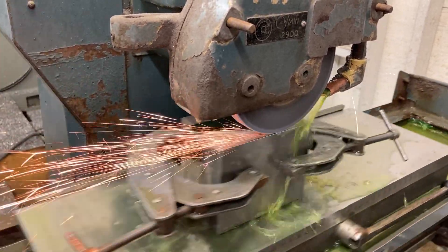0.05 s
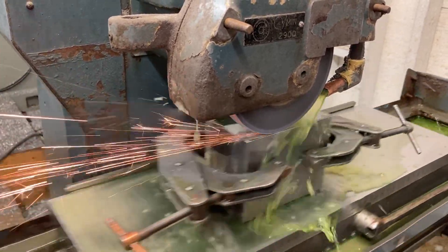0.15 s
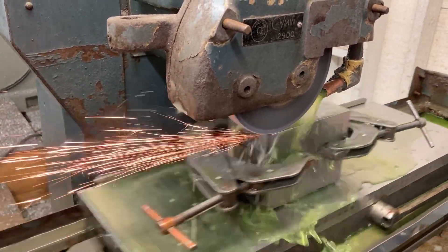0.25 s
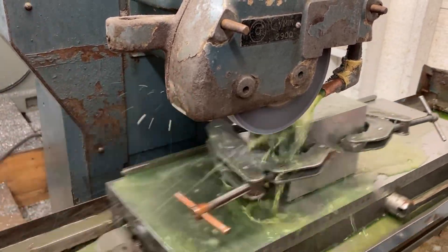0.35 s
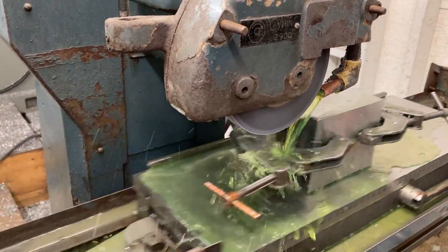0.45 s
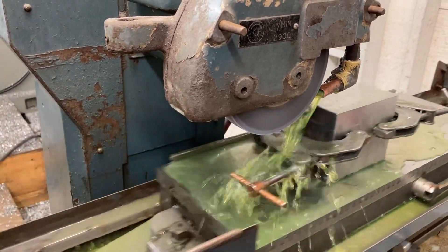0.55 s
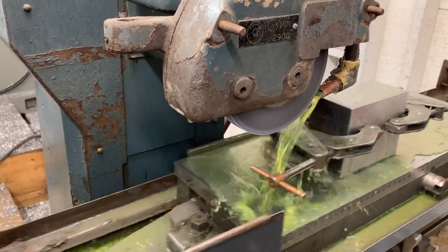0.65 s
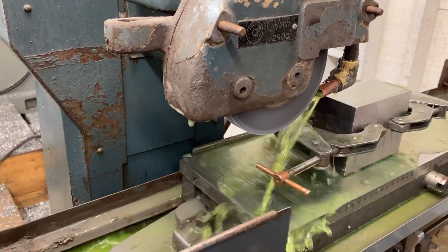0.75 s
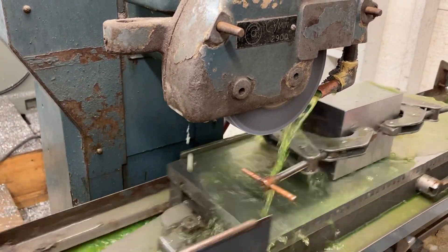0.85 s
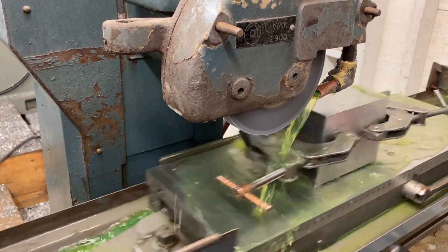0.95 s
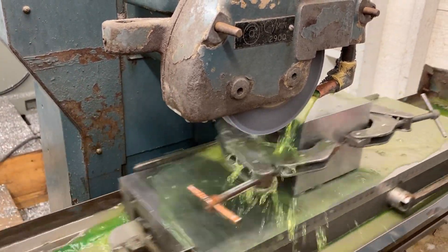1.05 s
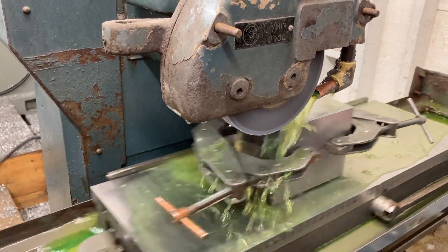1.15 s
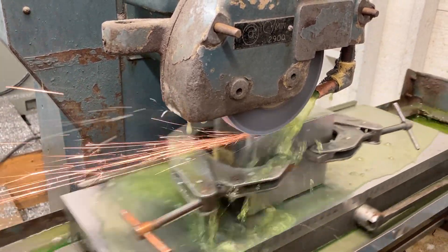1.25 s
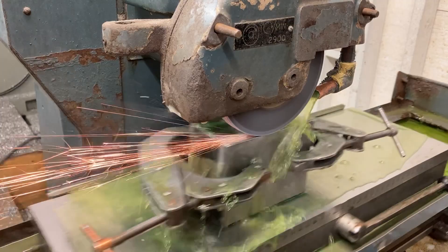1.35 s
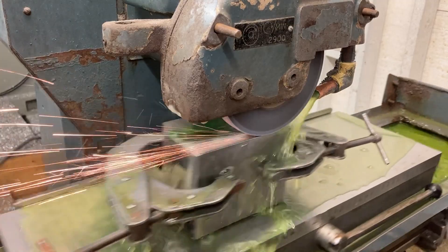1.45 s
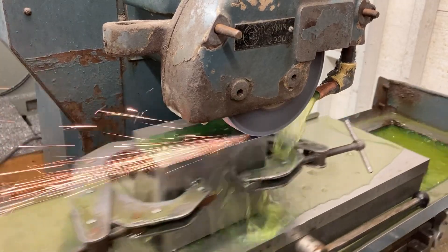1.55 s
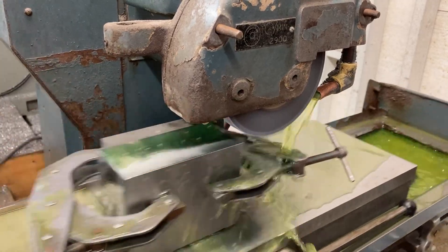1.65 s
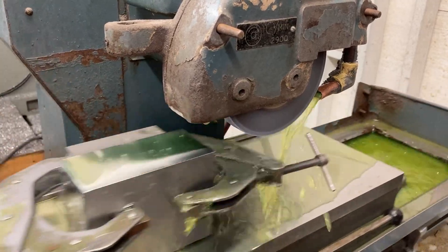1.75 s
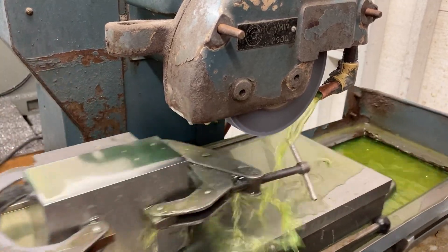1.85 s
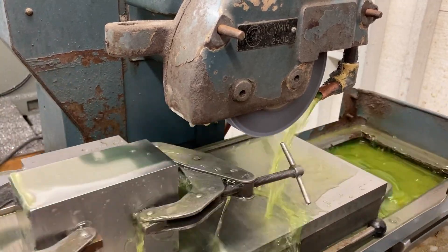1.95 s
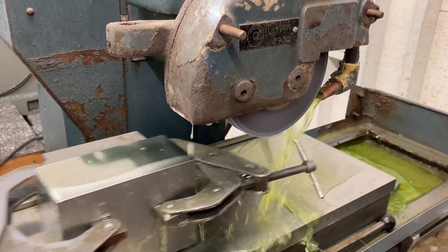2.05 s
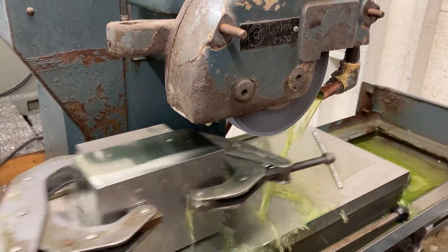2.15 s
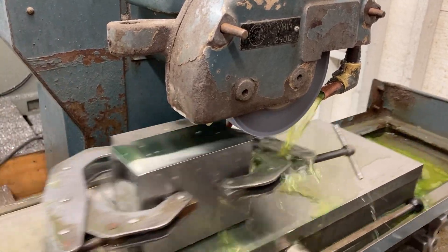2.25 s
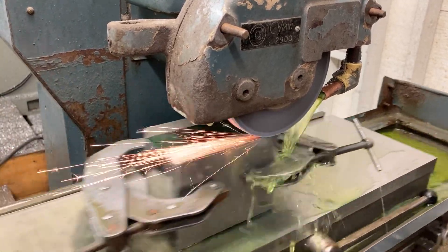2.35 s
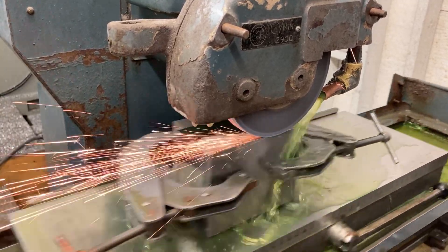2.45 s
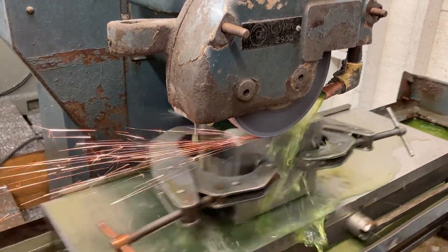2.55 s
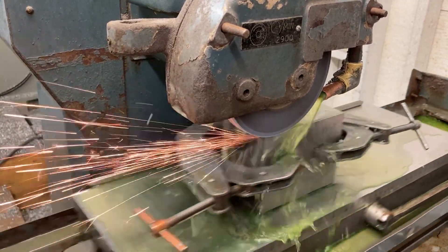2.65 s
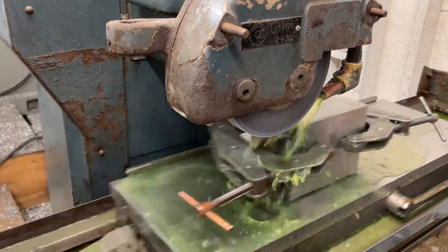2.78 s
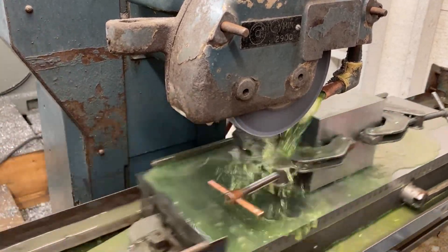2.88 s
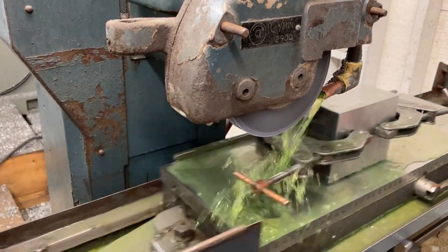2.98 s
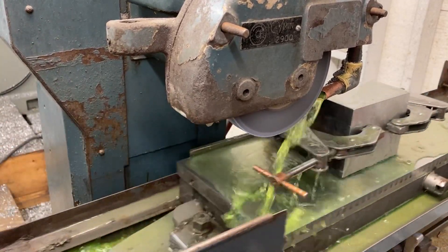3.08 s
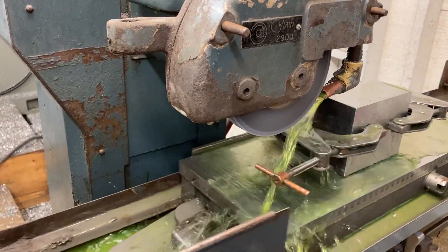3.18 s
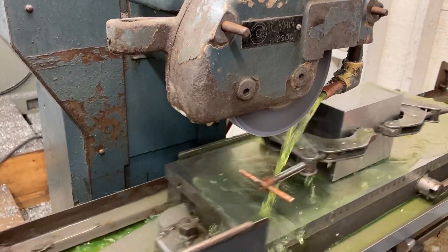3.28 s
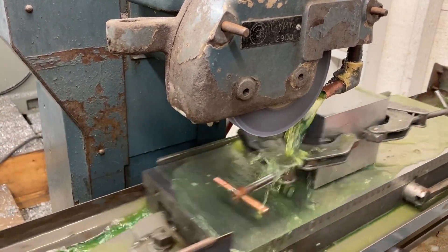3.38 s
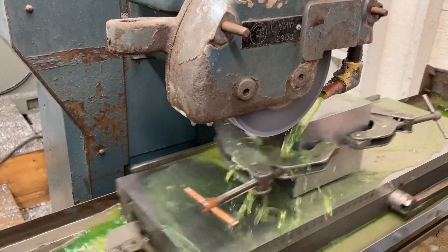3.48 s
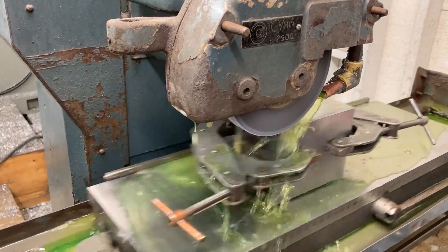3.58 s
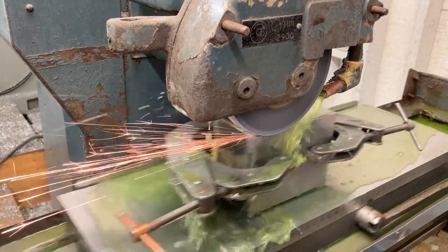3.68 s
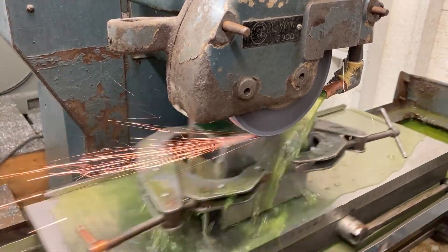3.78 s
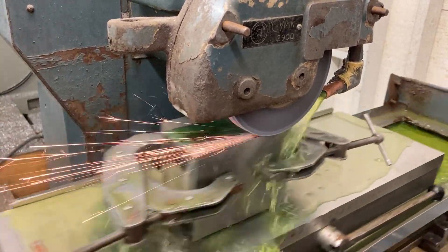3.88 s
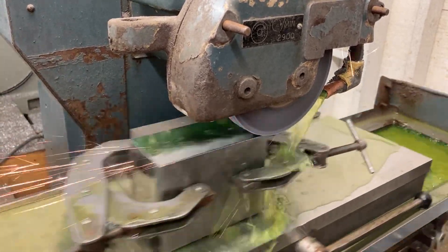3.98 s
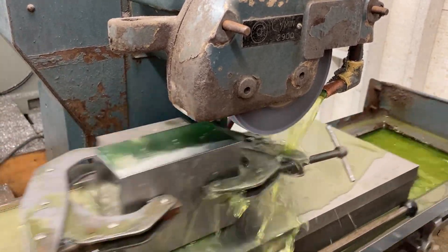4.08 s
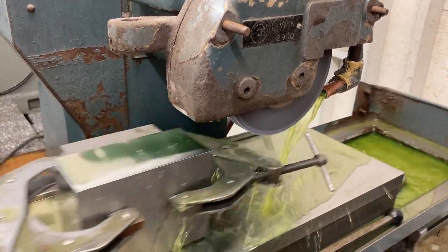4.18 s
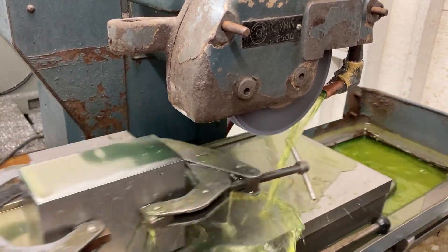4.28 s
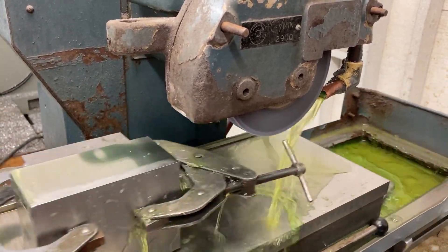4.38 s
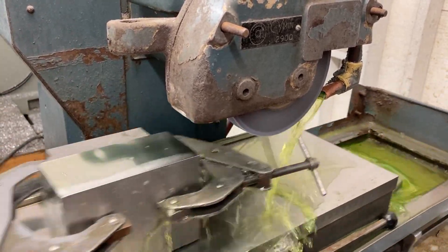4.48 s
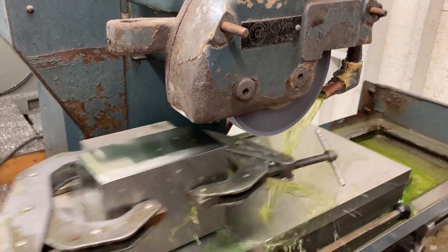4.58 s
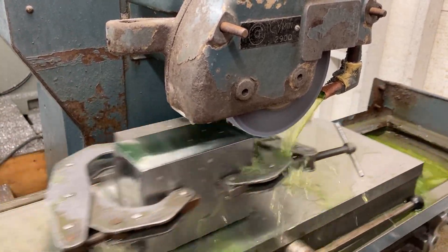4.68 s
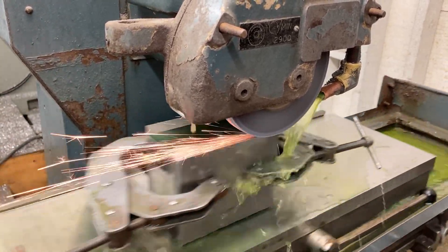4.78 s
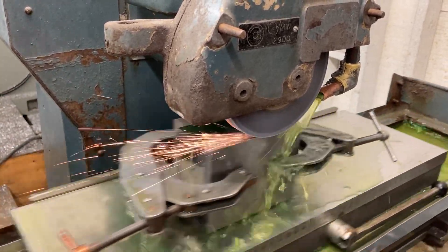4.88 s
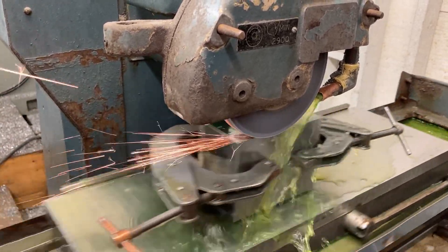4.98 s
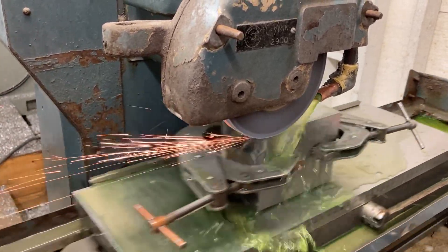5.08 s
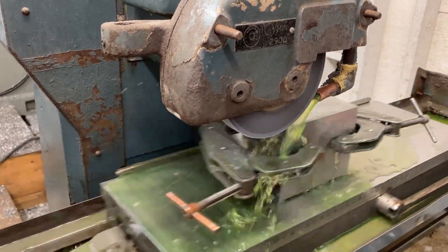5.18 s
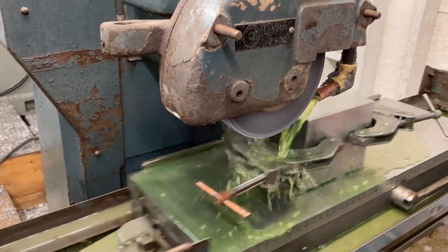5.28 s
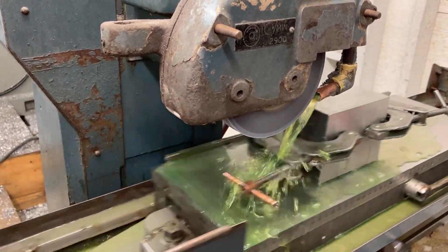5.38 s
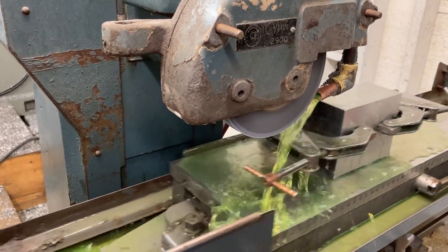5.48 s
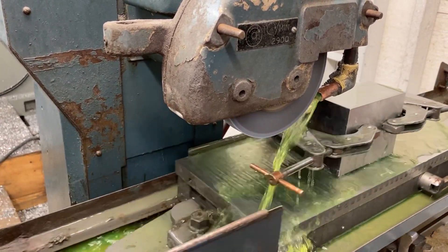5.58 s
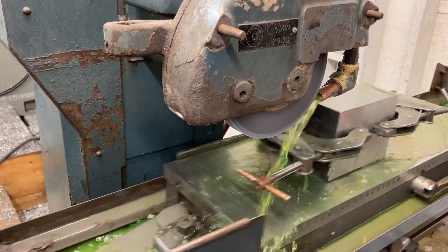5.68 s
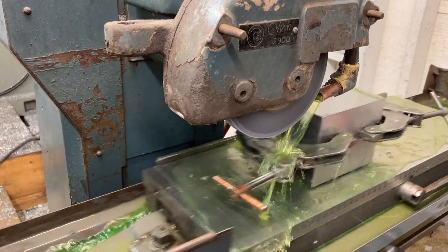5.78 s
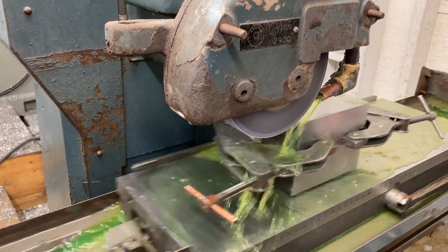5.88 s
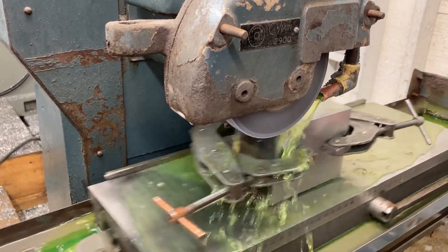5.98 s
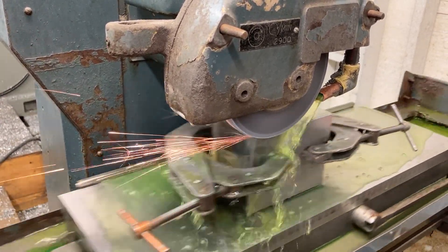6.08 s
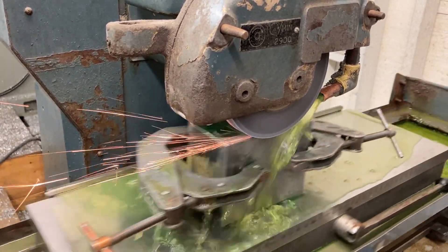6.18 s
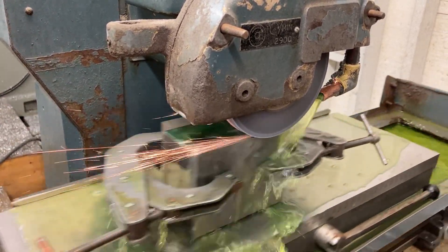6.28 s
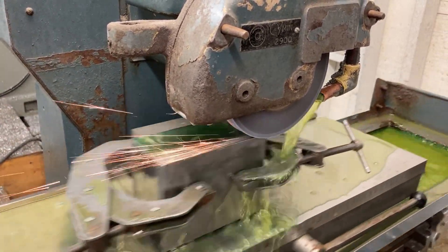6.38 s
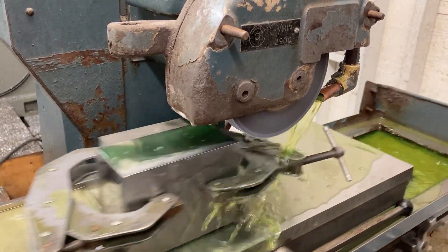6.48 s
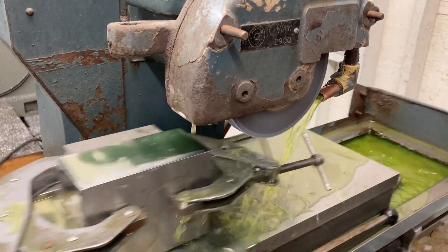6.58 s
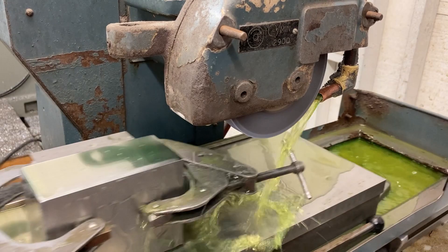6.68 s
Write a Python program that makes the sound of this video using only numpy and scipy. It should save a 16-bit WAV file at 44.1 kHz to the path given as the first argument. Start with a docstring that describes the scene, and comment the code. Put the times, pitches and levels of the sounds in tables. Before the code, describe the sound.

Harsh, ringing bursts of grinding come about every 1.2 seconds over motor whine and pump hum, each followed by a metallic clack and quick clicking.

```python
"""In a machine shop, a surface grinder carries a steel block to and fro under its wheel.
Grit force, repeating with each turn, excites resonances that sing at each pass. Trip dogs clack on the
reversing lever and the cross-feed ratchet rattles: short contact forces that ring steel modes.
The hydraulic pump hums on a wavering sine, bearings whine in thin tones over noise bands, coolant
patters as rising blips, and coloured noise fills the shop. A phone close by hears it in stereo."""
import sys
import numpy as np
from scipy import signal
from scipy.fft import rfft, irfft, next_fast_len
from scipy.io import wavfile
from scipy.ndimage import uniform_filter1d

SR = 44100
rng = np.random.default_rng(int(sys.argv[2]) if len(sys.argv) > 2 else 0)


def wav_record(signal):
    """Record a signal, one row per channel, as 16-bit PCM in the file named by sys.argv[1]."""
    frames = np.transpose(np.atleast_2d(signal))
    bounded = np.clip(frames, -1, 1)
    # unit amplitude maps onto the largest positive 16-bit level
    quanta = np.round(bounded * 32767).astype(np.int16)
    wavfile.write(sys.argv[1], SR, quanta)


N = 297234
SIZE = next_fast_len(N + SR // 2)  # padded, so that echoes do not wrap round
HZ = np.fft.rfftfreq(SIZE, 1 / SR) + 1e-3  # the offset avoids division by zero
T = np.arange(N) / SR


def undb(db):
    """Decibel law: amplitude gain of a level in dB."""
    return 10 ** (np.asarray(db) / 20)


def level(x, db):
    """Root-mean-square level: scale a signal to it."""
    return x * undb(db) / np.sqrt(np.mean(x ** 2))


def through(x, response):
    """Linear filtering: multiply the spectrum by a frequency response."""
    return irfft(rfft(x, SIZE) * response, SIZE)[..., :N]


def modes(table):
    """Modal superposition: summed resonances (Hz, width Hz, dB), alternate ones in opposite sense."""
    total = 0
    for k, (f, width, db) in enumerate(table):
        total = total + (-1) ** k * undb(db) / (1 + 1j * (HZ - f * f / HZ) / width)
    return total


def colour(table):
    """Spectral shaping: gain through (Hz, dB) points on a logarithmic frequency axis."""
    f, db = np.transpose(table)
    return undb(np.interp(np.log(HZ), np.log(f), db))


def walk(rate):
    """Slow random modulation: values held 1 / rate s and smoothed twice; spread near 1."""
    hold = int(SR / rate)
    steps = np.repeat(rng.standard_normal(N // hold + 1), hold)
    return 1.344 * uniform_filter1d(uniform_filter1d(steps, hold), hold)[:N]


def gliding(x, hz, width):
    """Heterodyne resonance: its pitch moves with time, gain 1 at its centre."""
    turn = np.exp(2j * np.pi * np.cumsum(hz) / SR)
    keep = np.exp(-np.pi * width / SR)
    return 2 * np.real(turn * signal.lfilter([1 - keep], [1, -keep], x / turn))


def scatter(lags_ms, gain):
    """All-pass scattering: echoes off nearby guards and castings spread time, not spectrum."""
    delays = [np.exp(-2j * np.pi * HZ * ms / 1000) for ms in lags_ms]
    return np.prod([(gain + d) / (1 + gain * d) for d in delays], axis=0)


def grit(turn_hz, count, wear, fresh, uneven_db):
    """Near-periodic excitation: grains strike once a turn; wear renews the finest detail first."""
    period = int(round(SR / turn_hz))
    orders = np.arange(period // 2 + 1)
    drift = wear * (orders / 200 + 0.11) * rng.standard_normal((count // period + 1, len(orders)))
    drift = np.sqrt(7) * uniform_filter1d(drift, size=7, axis=1)  # neighbouring orders slip together
    phase = 2 * np.pi * rng.random(len(orders)) + np.cumsum(drift, axis=0)
    strength = undb(uneven_db * rng.standard_normal(len(orders)))
    turns = level(irfft(strength * np.exp(1j * phase), period), 0)
    turns = turns + fresh * rng.standard_normal(turns.shape)  # chips that never repeat
    return level(turns.ravel()[:count], 0)


# Passes under the wheel: (first contact [s], last contact [s], bite before resonances [dB],
# wheel ring relative to bite, before its modes [dB], tilt of that ring from mid-pass to the end [dB])
PASSES = [(-.03, 0.312, -28.5, 14, 0.5), (1.241, 1.59, -28.5, 9.5, 2.5), (2.375, 2.73, -27, 10.5, 2),
          (3.658, 4.01, -30, 7.5, -2.5), (4.789, 5.142, -27.5, 3.5, -2), (6.075, 6.423, -29, 6, -1.5)]
# Wheel speed in each pass: (turns per second [Hz])
WHEEL_SPEEDS = [50.69, 50.71, 50.8, 50.89, 51.0, 51.16]
# Broad rasp of the grit: (frequency [Hz], relative level [dB])
RASP_COLOUR = [(400, -10.5), (700, 2), (1700, -4), (2700, -12), (4500, -4), (7000, -12), (10000, -46),
               (11750, -1), (12800, -12), (14000, -11), (16000, -13)]
# Resonances of the wheel: (frequency [Hz], width [Hz], relative level [dB])
WHEEL_MODES = [(7770, 10, 10), (7822, 70, -3), (8120, 190, -12)]
# Metal parts that ring under the grit, a list for each: (frequency [Hz], width [Hz], relative level [dB])
PART_MODES = [
    [(1680, 160, 6), (2020, 86, 16), (2456, 190, 4.5)],
    [(2948, 30, 3)],
    [(3685, 80, 10.5), (4010, 35, 4), (5550, 100, 3)],
    [(7465, 20, 20.5)],
    [(10300, 40, 7), (10580, 50, 13), (10830, 150, 13), (11300, 60, 12)],
    [(10900, 700, 5), (11070, 120, 14)],
    [(12215, 22, 17), (12630, 32, 12)],
    [(3447, 30, 10)],
]
# Each pass meets another strip of the block: (drive of each row of parts [dB], ...)
STRIP_DRIVES = [(-1, 12.5, 9, 7, -1, 7, -7, 2), (2, 7, 7.5, 3.5, 0.5, 4.5, -9, 8),
                (-0.5, 3.5, -4, 0, -2, 1.5, -1, 0.5), (.9, 3, 3.5, 2, -3.5, 5.5, 3, 3),
                (-3, 1, -1.5, -1, -1, 2, 0, 5), (-2, -13, 3, 3, 1.5, 3.5, 2, 11.5)]
# Drive of the block's ring as the wheel crosses it, a curve for each pass: (time [s], relative level [dB])
BLOCK_CURVES = [
    [(0.0, -30), (0.152, -40), (0.2, -52), (0.254, -28.5), (0.3, -29)],
    [(1.26, -31), (1.286, -38), (1.33, -34.5), (1.556, -31), (1.58, -36)],
    [(2.39, -49), (2.456, -52), (2.506, -57), (2.68, -35), (2.72, -31)],
    [(3.675, -33.5), (3.751, -38), (3.873, -51), (3.915, -41), (4.0, -49)],
    [(4.805, -25.5), (4.841, -37), (4.927, -39), (5.021, -30), (5.13, -31.5)],
    [(6.09, -30), (6.114, -29), (6.415, -38)],
]
# The rim bursts once a turn as its proud side strikes: (delay of first burst from start of pass [turns])
RIM_CRESTS = [.92, .14, .13, .02, .78, .67]
# Swing of the bursts above and below the middle, in each pass: (level [dB])
RIM_THROBS = [2.6, 2.7, 1.5, 4.9, 2.4, 3.7]
# Rows of the parts that belong to the rim: (row index)
RIM_ROWS = (4, 5)
# Rows of the parts that sing a clean tone: (row index)
STEADY_ROWS = (1,)
WHEEL_ARCH_DB = 2.5  # the wheel rings most in mid-pass
BLOCK_HZ, BLOCK_WIDTH_HZ, BLOCK_FADE_HZ = 3396, 22, 32  # ring, how narrow it sings, how fast it follows load
PART_FLICKER_DB = 1.7  # the parts ring unevenly as the contact moves


def grinding():
    """Forced vibration: grit drives the rasp, parts and wheel; the block's ring is returned apart."""
    part_count = len(PART_MODES)
    force = np.zeros((part_count + 3, N))  # the parts, then rasp, wheel and block
    passes = zip(PASSES, WHEEL_SPEEDS, STRIP_DRIVES, BLOCK_CURVES, RIM_CRESTS, RIM_THROBS)
    for cut, turn_hz, strip, block_curve, crest, throb_db in passes:
        first, last, bite_db, wheel_db, wheel_tilt = cut
        t = T[(T >= first) & (T < last)]
        across = 2 * (t - first) / (last - first) - 1  # from -1 to 1
        edge = np.clip(np.minimum((t - first) / 0.0027, (last - t) / 0.0018), 0, 1)
        bite = edge * undb(bite_db)
        push = bite * grit(turn_hz, count=len(t), wear=0.57, fresh=0.51, uneven_db=2.5)
        # the coarse, lasting part of the pattern
        pound = bite * grit(turn_hz, count=len(t), wear=0.25, fresh=0.15, uneven_db=.8)
        throb = level(undb(throb_db * np.cos(2 * np.pi * (turn_hz * (t - t[0]) - crest))), 0)
        sung = edge * level(gliding(pound, np.full(len(t), BLOCK_HZ), BLOCK_WIDTH_HZ), 0)
        block_gain = undb(np.interp(t, *np.transpose(block_curve)))
        wheel_gain = undb(wheel_db + wheel_tilt * across - WHEEL_ARCH_DB * across ** 4)
        drives = []
        for row, gain in enumerate(undb(strip)):
            drive = gain * (pound if row in STEADY_ROWS else push)
            drives.append(drive * throb if row in RIM_ROWS else drive)
        drives += [push, push * wheel_gain, sung * block_gain]
        start = int(round(t[0] * SR))
        force[:, start:start + len(t)] = drives
    bodies = [modes(part) for part in PART_MODES]
    bodies.append(undb(6.0) * colour(RASP_COLOUR))
    bodies.append(undb(12.5) * modes(WHEEL_MODES))
    bodies.append(modes([(BLOCK_HZ, BLOCK_FADE_HZ, 1.5)]))
    force[:part_count] *= undb([PART_FLICKER_DB * walk(14) for _ in PART_MODES])
    rings = through(force, np.array(bodies))
    return rings[:-1].sum(axis=0), rings[-1]


def blows(table, rattle_ms, loose, tail, tail_ms):
    """Impact excitation: a push as long as the contact with chatter of loose parts, and a bright crack."""
    force, crack = np.zeros(N + 2000), np.zeros(N + 2000)
    t_ms = np.arange(2000) / SR * 1000
    decay = np.exp(-t_ms / rattle_ms) + tail * np.exp(-t_ms / tail_ms)
    chatter = rng.standard_normal((len(table), 2000)) * decay
    for (s, db, contact_ms), noise in zip(table, chatter):
        push = np.sin(np.pi * np.clip(t_ms / max(contact_ms, .03), 0, 1))
        gain = undb(db) / push.sum()  # equal impulse whatever the contact time
        rattle = np.convolve(noise, push[:100])[:2000]
        force[int(s * SR):][:2000] += gain * (push + loose * rattle)
        crack[int(s * SR):][:2000] += gain * noise
    return force[:N], np.diff(crack[:N], prepend=0)


def bounced(dogs, rebounds):
    """Repeated impact: each blow with the rebounds that follow it."""
    rows = []
    for s, db, contact_ms in dogs:
        for late, less, soft_ms in [(0, 0, contact_ms), *rebounds]:
            rows.append((s + late, db + less, soft_ms))
    return [row for row in rows if row[0] < N / SR]


# Trip dogs on the reversing lever, near and far end in turn: (time [s], blow before modes [dB], contact [ms])
DOG_BLOWS = [(.5038, -13, 0.17), (1.7403, -5.5, 0.052), (2.9196, -13, 0.12), (4.1568, -5, 0.047),
             (5.3352, -11.5, 0.13), (6.5728, -4.5, 0.049)]
# Rebounds at the near end: (time after the blow [s], level relative to it [dB], contact [ms])
NEAR_REBOUNDS = [(.0022, 10, .15), (.0091, 3, .2), (.0176, -3, .3), (.0296, -5, .3)]
# Rebounds at the far end: (time after the blow [s], level relative to it [dB], contact [ms])
FAR_REBOUNDS = [(.0109, -11, 0.2), (.0144, -8, 0.2), (.0236, -15, .45), (.2440, -7, .45), (.2475, -5, .45)]
# Lever modes at the near end: (frequency [Hz], width [Hz], relative level [dB])
NEAR_MODES = [(1100, 300, -14), (1470, 190, 3), (2240, 210, 3), (3650, 400, -15), (5600, 400, -22)]
# Lever modes at the far end: (frequency [Hz], width [Hz], relative level [dB])
FAR_MODES = [(920, 250, -3), (1690, 350, -2), (2000, 300, -6), (2450, 350, -4), (4900, 900, -22)]


def lever():
    """Impact response: each dog rings the lever; the first touch cracks a moment before the blow."""
    near_blows = bounced(DOG_BLOWS[::2], NEAR_REBOUNDS)
    far_blows = bounced(DOG_BLOWS[1::2], FAR_REBOUNDS)
    near, near_crack = blows(near_blows, rattle_ms=3.6, loose=0.2, tail=0.38, tail_ms=16)
    far, far_crack = blows(far_blows, rattle_ms=0.72, loose=0.6, tail=0.25, tail_ms=17.0)
    edge = modes([(5500, 2600, -1.8)])
    near_early, far_early = [np.exp(2j * np.pi * HZ * ms / 1000) for ms in (1.5, .7)]
    cracks = through(near_crack, edge * near_early) + through(far_crack, edge * far_early)
    linkage = scatter((.37, .9), .5)  # a blow spreads out on its way through the joints
    rings = through(near, undb(13) * modes(NEAR_MODES) * linkage)
    rings += through(far, undb(16) * modes(FAR_MODES) * linkage)
    return rings + seating(), cracks


# Rings of the lever, a list for the near and one for the far end:
# (time after the blow [s], frequency [Hz], width [Hz], level relative to the blow, before its onset [dB])
SEAT_RINGS = [
    [(.0002, 790, 150, 5), (.0008, 2260, 140, 3), (.0022, 1480, 85, 2), (.0090, 2190, 150, -5),
     (.0110, 880, 80, -7)],
    [(-.0004, 2400, 190, -3), (-.0004, 1720, 170, -3.5), (.0008, 1330, 200, -10), (.0020, 800, 110, -10),
     (.0141, 660, 150, -4), (.0132, 2480, 200, -11), (.0150, 1620, 250, -16)],
]


def seating():
    """Free decay: separate rings of arm, pivot and stop as each blow runs through them."""
    out, t = np.zeros(N + 2000), np.arange(2000) / SR
    onset = 1 - np.exp(-t / 0.00039)
    for k, (s, db, _) in enumerate(DOG_BLOWS):
        for late, hz, width, less in SEAT_RINGS[k % 2]:
            ring = np.sin(2 * np.pi * hz * t) * np.exp(-np.pi * width * t) * onset
            out[int((s + late) * SR):][:2000] += undb(db + less) * ring
    return out[:N]


# Cross-feed after each reversal: (first tooth [s], last tooth [s], blow before modes [dB],
# slowing of the run [share], leading ring at first tooth [Hz], at last tooth [Hz])
FEED_RUNS = [(.622, 0.77, -27.5, 0.18, 3170, 3550), (1.857, 1.998, -28.5, -0.19, 3190, 2790),
             (3.038, 3.185, -28.5, 0.14, 3760, 3520), (4.283, 4.432, -28, -0.017, 3570, 3870),
             (5.449, 5.628, -27.5, 0.22, 3240, 3790), (6.687, 6.835, -28, -0.09, 3200, 3200)]
# Teeth in each run: (count)
TOOTH_COUNTS = [11, 10, 10, 10, 12, 10]
# The pawl clicks back: (time [s], blow before modes [dB])
PAWL_RESETS = [(1.061, -25.5), (1.111, -25.5), (2.293, -29.5), (3.494, -26.5), (4.706, -26), (5.894, -26.5),
               (5.941, -25)]
# Small steel parts of the pawl: (frequency [Hz], width [Hz], relative level [dB])
PAWL_MODES = [(1840, 1220, -5.5), (4930, 7900, -18), (7816, 71, 5.5), (9880, 130, -6.5), (12700, 127, 7)]
# Links of the feed: (frequency [Hz], width [Hz], relative level [dB])
LINK_MODES = [(2710, 90, -3), (3150, 50, -4), (3496, 60, -5), (3750, 50, -4), (4180, 70, -10)]
TOOTH_SCATTER_DB, TOOTH_JITTER_S = -1.14, 0.00098  # random spread; jitter is greatest in mid-run
FEED_SWELL_DB = -0.5  # middle of a run against its ends
LEAD_WIDTH_HZ = 22
LINK_DRIFT, LINK_DRIFT_RATE, LINK_FLICKER_DB = .016, 9, 2.5  # pitch spread as a share; steps a second; spread
DRAG = .8  # noise against the smoothed force


def ratchet():
    """Impact and friction: the pawl drops over each tooth and drags; the leading ring shifts along each run."""
    clicks, leads = list(PAWL_RESETS), []
    for (first, last, db, slows, first_hz, last_hz), count in zip(FEED_RUNS, TOOTH_COUNTS):
        u, chance = np.linspace(0, 1, count), rng.standard_normal((count, 2))
        arch = np.sin(np.pi * u)
        when = first + (last - first) * (u - slows * u * (1 - u))
        when = when + TOOTH_JITTER_S * chance[:, 0] * arch
        clicks += zip(when, db + FEED_SWELL_DB * (arch - .5) + TOOTH_SCATTER_DB * chance[:, 1])
        leads += [(first, first_hz), (last, last_hz)]
    contacts = [(s, db, .04) for s, db in clicks if s < N / SR]
    force, crack = blows(contacts, rattle_ms=5.3, loose=0.16, tail=0.42, tail_ms=12.3)
    load = np.sqrt(np.abs(uniform_filter1d(force ** 2, size=SR // 40)))
    scrape = .5 * force + DRAG * load * rng.standard_normal(N)  # between teeth the pawl drags on the steel
    links = np.zeros(N)
    for hz, width, db in LINK_MODES:
        share = undb(db + LINK_FLICKER_DB * walk(18))
        pitch = hz * (1 + LINK_DRIFT * walk(LINK_DRIFT_RATE))  # wanders as the links are loaded
        links += undb(29.5) * gliding(scrape * share, pitch, width)
    lead_hz = np.interp(T, *np.transpose(leads)) * (1 + .004 * walk(20))
    lead = undb(27) * gliding(scrape, lead_hz, LEAD_WIDTH_HZ)
    rasp = through(scrape, undb(10.5) * modes([(2600, 1800, 0)]))
    pawl = through(force, undb(25.0) * modes(PAWL_MODES))
    return links + lead + rasp + pawl + undb(-12.0) * crack


# Swells of the hydraulic pump, most of them after a reversal: (time [s], hum rise [dB], hold [s],
# oil rise [dB], thud before its envelope [dB])
PUMP_SWELLS = [(.64, 2, 0.086, -4.5, -43), (.77, 7, 0.13, 0.5, -40), (1.69, -0.5, 0.033, 1.5, -47),
               (2.02, 7.5, 0.017, -2.5, -5), (3.21, 5, 0.63, 1.5, -40), (4.42, 5.5, 0.1, 7.5, -1),
               (5.62, 5.5, 0.67, 5.5, -35), (6.5, 1, 0.044, 3, -37)]
HUM_HZ, HUM_DB, OIL_DB = 156.4, -34, -39.5  # centre pitch and resting levels, about which they waver
SWELL_RISE_S, SWELL_FADE_S, THUD_HZ = .04, 0.26, 207.4


def pump():
    """Tonal and turbulent noise: pressure pulses hum, oil rumbles in the bed; both swell, hold and fade."""
    hum_db, oil_db = HUM_DB, OIL_DB
    for s, hum_rise, hold, oil_rise, _ in PUMP_SWELLS:
        swell = np.clip((T - s) / SWELL_RISE_S, 0, 1)
        swell = swell * np.exp(-np.clip(T - s - hold, 0, None) / SWELL_FADE_S)
        hum_db = hum_db + hum_rise * swell
        oil_db = oil_db + oil_rise * swell
    phase = 2 * np.pi * np.cumsum(HUM_HZ + 1.85 * walk(24.69)) / SR
    hum = np.sqrt(2) * np.sin(phase) * undb(.9 * walk(9) + 1.4 * walk(22))
    bed = modes([(210.0, 26, -4.0), (284, 54, -3.0), (318.5, 17.3, 6.0)])
    oil = level(through(rng.standard_normal(N), bed), 0)
    return hum * undb(hum_db) + oil * undb(oil_db + 1.45 * walk(6.8))


def thuds():
    """Damped resonance: a dull ring of the bed casting just after the start of each pump swell."""
    out, t = np.zeros(N + SR // 2), np.arange(SR // 2) / SR
    ring = np.sin(2 * np.pi * THUD_HZ * t) * (1 - np.exp(-t / 0.13)) * np.exp(-t / 0.031)
    for s, *_, db in PUMP_SWELLS:
        out[int((s + 0.025) * SR):][:len(t)] += undb(db) * ring
    return out[:N]


# Thin tones of spindle and motor: (centre frequency [Hz], width of wander [Hz])
WHINE_TONES = [(558.5, 4.5), (592, 4), (599.3, 2), (659.5, 3.5), (763.6, 2.3), (778, 1.2), (1184.1, 3.5),
               (1197.9, 3), (1225.7, .6), (1246.4, 3), (1474.9, 2.7), (1601, .5), (1627, 4), (1642.1, .5),
               (1678.8, 5), (1883.5, 4)]
# Middle level of each tone, about which it wavers: (level [dB])
WHINE_LEVELS = [-56, -65.5, -51.5, -48.5, -60.5, -54, -49, -47.5, -57.5, -44.5, -51, -57, -50, -58, -64.5,
                -56.5]
# Rolling noise of the bearings: (frequency [Hz], width of each of two cascaded resonances [Hz], level [dB])
ROLLING_BANDS = [(564, 47, -63), (645, 17, -65), (867, 72, -37), (1202, 20.5, -42.5), (1245, 51, -43.5),
                 (1618, 19, -43.5)]
WHINE_WAVER_DB = 3.2


def bearings():
    """Rotational tones: thin whines that wander in pitch and level, over narrow bands of rolling noise."""
    response = 0
    for hz, width, db in ROLLING_BANDS:
        band_gain = undb(db) * np.sqrt(2 * SR / np.pi / width)  # makes up for the narrow band
        response = response + modes([(hz, width, 0)]) ** 2 * band_gain
    out = through(rng.standard_normal(N), response)
    for (hz, wander), db in zip(WHINE_TONES, WHINE_LEVELS):
        gain = np.sqrt(2) * undb(db + WHINE_WAVER_DB * walk(4.82))
        cycles = rng.random() + np.cumsum(hz + wander / 2 * walk(6)) / SR
        out += gain * np.sin(2 * np.pi * cycles)
    return out


# Chosen coolant drops and one broad click at 0.846 s:
# (time [s], blip level before decay and splash [dB], starting pitch [Hz])
DROPS_AND_CLICK = [(0.4638, -28.5, 7760), (0.8455, -27, 1860), (0.8457, -23, 4300), (0.862, -38, 3100),
                   (2.03, -30, 3460), (2.228, -30, 3270), (3.2544, -37, 2980), (3.268, -33, 3250),
                   (4.2597, -34, 3260), (4.5519, -34, 3300), (4.6838, -35, 3200), (5.9156, -28, 3220)]


def coolant():
    """Short transients: drops patter as rising blips with a splash, of very uneven size; one click joins them."""
    out, t = np.zeros(N + 400), np.arange(400) / SR
    drops = list(DROPS_AND_CLICK)
    for when, pitch, size in rng.random((900, 3)):
        drops.append((when * N / SR, -50 - 3 * np.log(1 - size), 2200 * 4.5 ** pitch))
    for (s, db, hz), noise in zip(drops, rng.standard_normal((len(drops), 400))):
        blip = np.sin(2 * np.pi * hz * t * (1 + 30 * t)) * np.exp(-t * hz / 5.5)
        splash = 2.7 * noise * np.exp(-t / 0.00038)
        out[int(s * SR):][:400] += undb(db) * (blip + splash)
    return out[:N]


# Machine and splash noise, before its drift: (frequency [Hz], spectral density [dB per Hz])
SHOP_COLOUR = [(25, -94), (60, -62), (130, -58), (350, -62), (430, -66.5), (600, -64.5), (1000, -69.5),
               (1700, -67.5), (2200, -73.5), (3500, -74.5), (6000, -83), (10000, -83.5), (13000, -85.5),
               (16000, -104)]


def shop():
    """Diffuse noise: machine and splash by three unrelated paths; four bands each drift a little."""
    noise = rfft(rng.standard_normal((3, N)), SIZE) * colour(SHOP_COLOUR) * np.sqrt(SR / 2)
    edges_hz = [0, 500, 2500, 7000, SR]
    out = np.zeros((3, N))
    for low, high in zip(edges_hz, edges_hz[1:]):
        band = irfft(noise * (HZ >= low) * (HZ < high), SIZE)[:, :N]
        out += undb(0.6 * walk(1.8) + 1.48 * walk(14)) * band
    return out


# Tilt between the sides: (frequency [Hz], gain on the left and equal loss on the right [dB])
SIDE_LEAN = [(300, -0.67), (1200, 1.2), (2500, 0.9), (5000, 1.5), (8000, 0.46)]
BASS_LEAN_DB, BASS_LAG_S = 0.86, 0.00045  # left against right; the lag shrinks as pitch rises
PORT_LAG_S = 1 / 4600  # in the treble the left side hears the right side later and upside down
FRONT_SIDE = 0.55  # strength of the opposed echoes of block and lever


def scene():
    """Stereo coherence: sides share bass, differ in mid echoes and share the treble at a lag."""
    rasp, block = grinding()
    steady = rasp + pump() + thuds() + bearings()
    knocks, cracks = lever()
    front = block + knocks
    hits = cracks + ratchet() + coolant()
    common, *diffuse = shop()
    bass = .975 / (1 + (HZ / 700) ** 2.2)
    treble = .93 / (1 + (5800 / HZ) ** 8)
    middle = np.sqrt(np.clip(1 - bass - treble, 0, 1))
    right = np.ones(len(HZ))
    bass_lag = BASS_LAG_S / (1 + (HZ / 400) ** 2)
    bass_left = undb(BASS_LEAN_DB) * np.exp(-2j * np.pi * HZ * bass_lag)
    treble_left = -np.exp(-2j * np.pi * HZ * PORT_LAG_S)
    shared = np.sqrt(bass) * np.array([bass_left, right])
    shared = shared + np.sqrt(treble) * np.array([treble_left, right])
    # small parts face the phone; the machine's drone also comes round the guards
    close = np.array([scatter((.22, 1.0), .55), scatter((.43, 1.6), .55)])
    echoes = np.array([scatter((.6, 2.3, 5.9), .55), scatter((1.1, 1.7, 6.7), .55)])
    lean = np.array([colour(SIDE_LEAN), 1 / colour(SIDE_LEAN)])
    # straight ahead, with one pair of echoes in opposite sense on the two sides
    ahead = 1 + np.array([[1], [-1]]) * FRONT_SIDE * scatter((.31, 1.3), 0.35)
    out = through(front, lean * ahead)
    out += through(steady + hits + common, lean * shared)
    out += through(steady, lean * middle * echoes)
    out += through(hits, lean * middle * close)
    out += through(np.array(diffuse), lean * middle)
    return out


TOP_HZ = 15720


def record(dry):
    """Saturation and band limit: the phone rounds the loudest peaks and cuts the top."""
    rounded = .9 * np.tanh(dry / .9)
    top_cut = signal.ellip(10, .2, 60, TOP_HZ, fs=SR, output="sos")
    return signal.sosfilt(top_cut, rounded)


dry = scene()
out = record(dry)
wav_record(out)
```